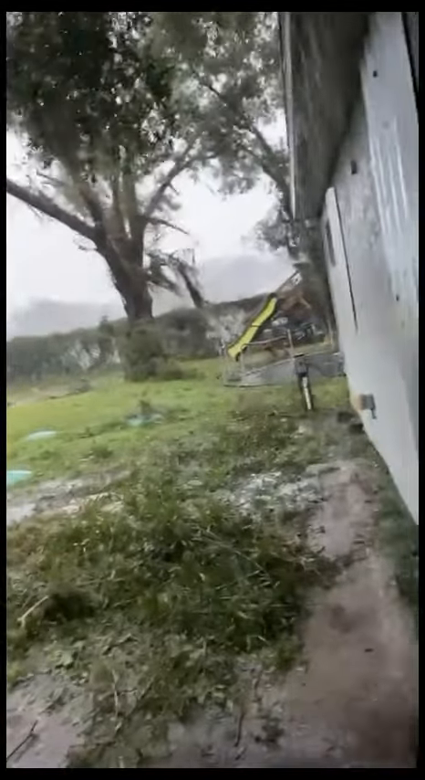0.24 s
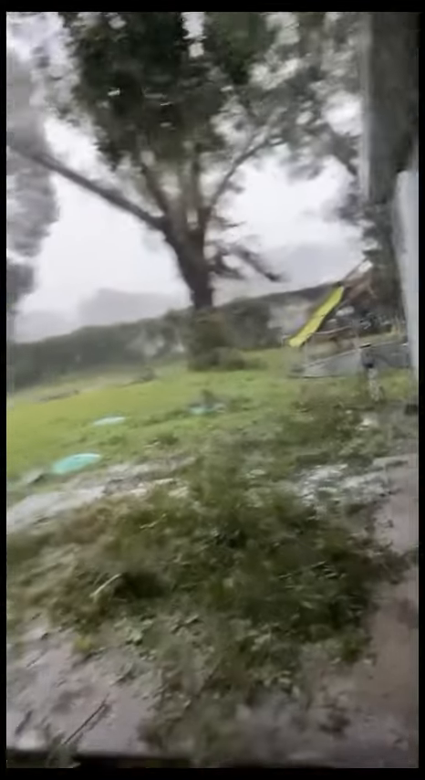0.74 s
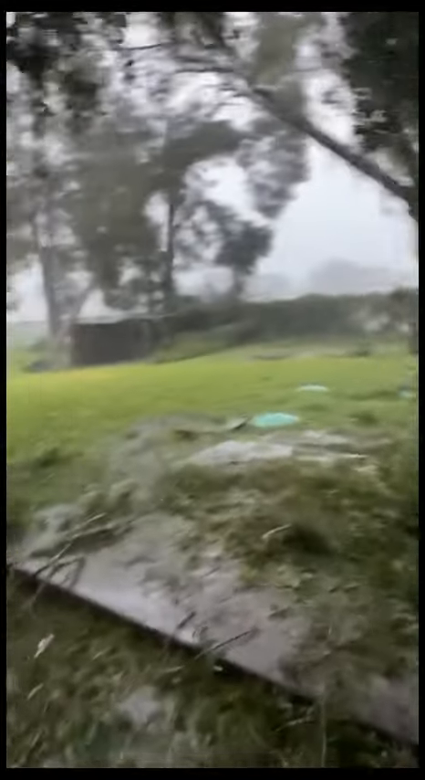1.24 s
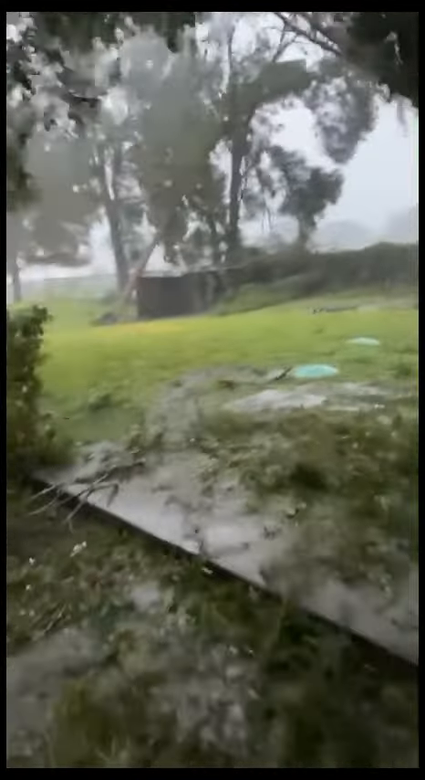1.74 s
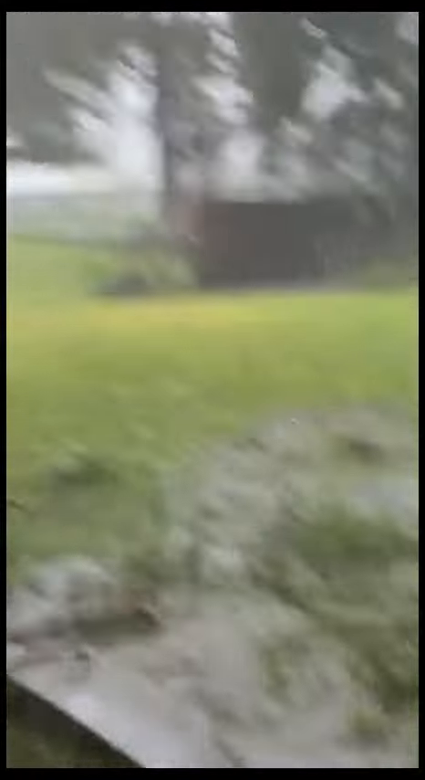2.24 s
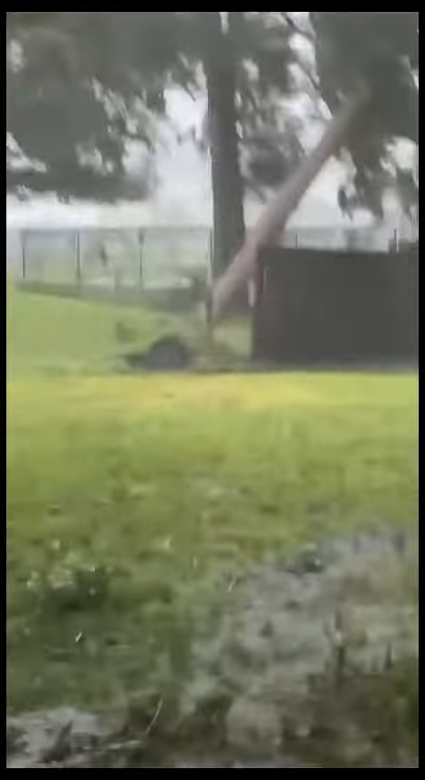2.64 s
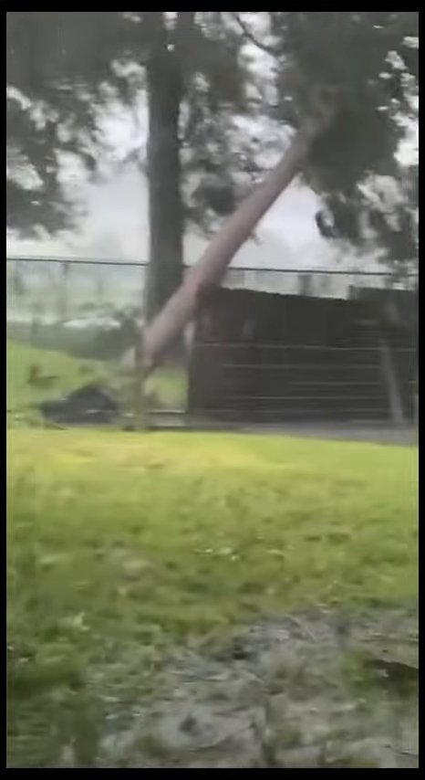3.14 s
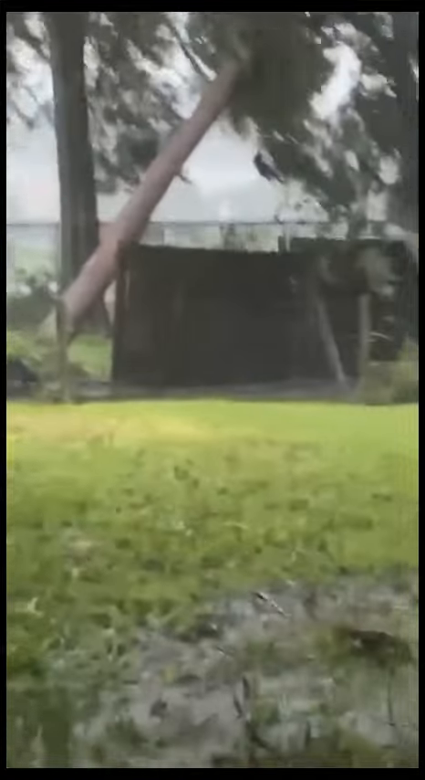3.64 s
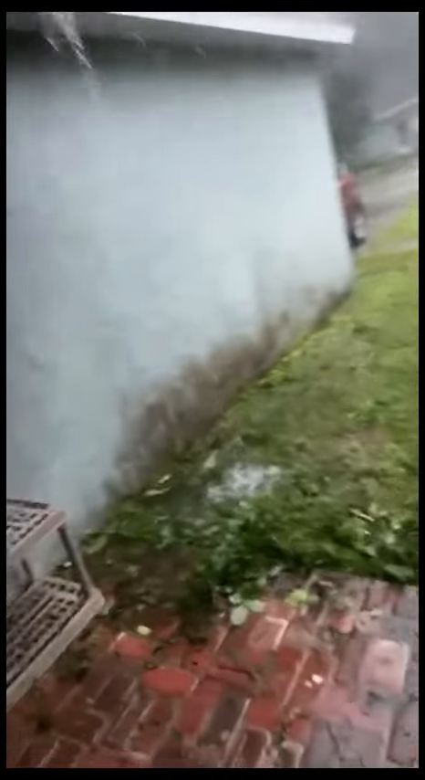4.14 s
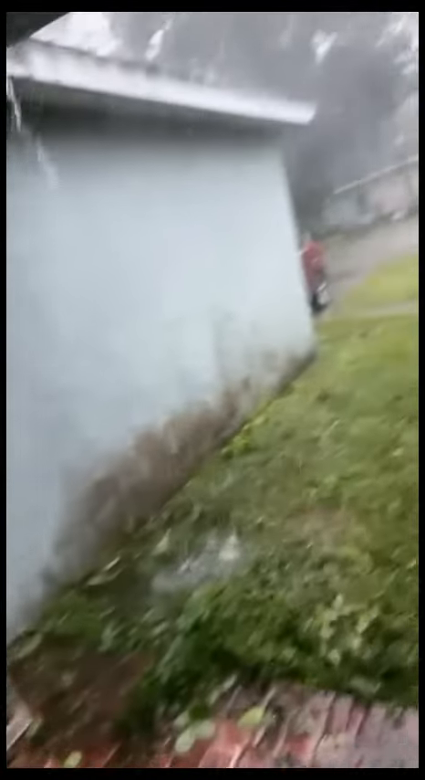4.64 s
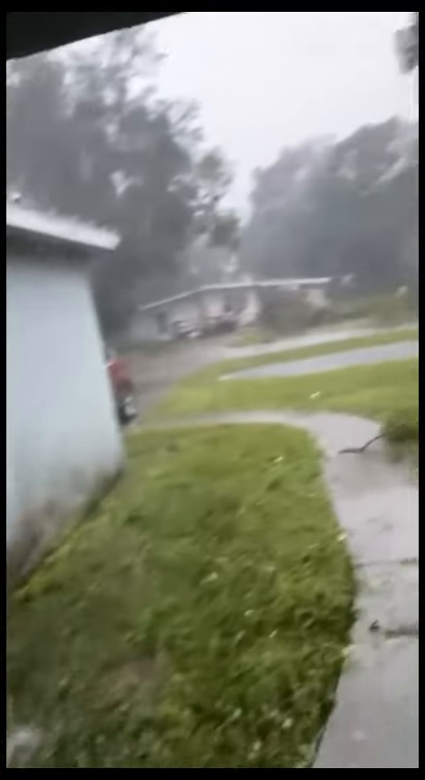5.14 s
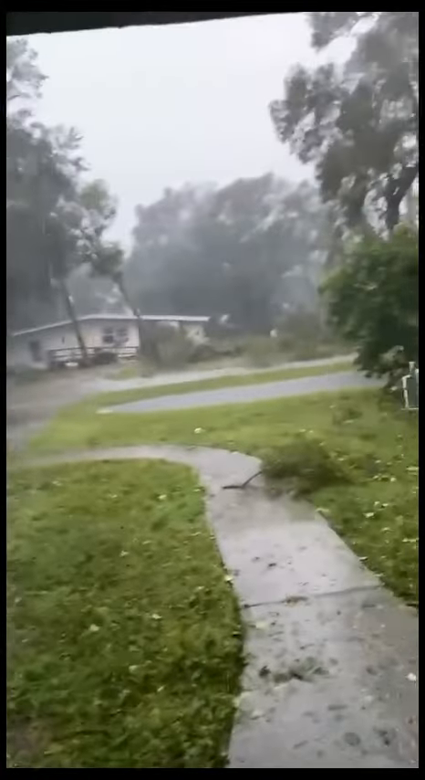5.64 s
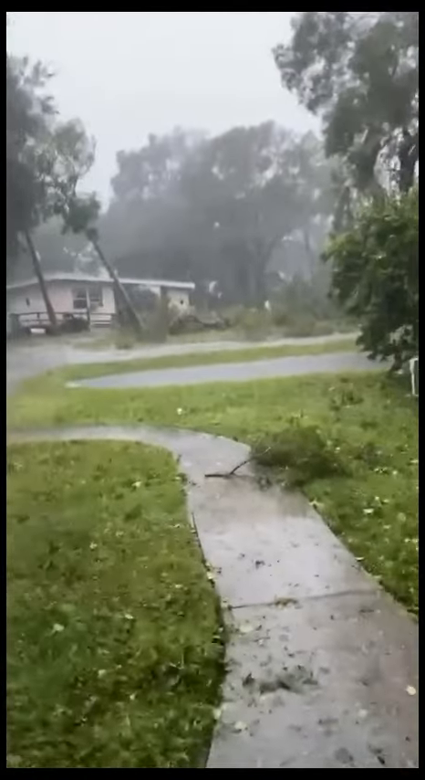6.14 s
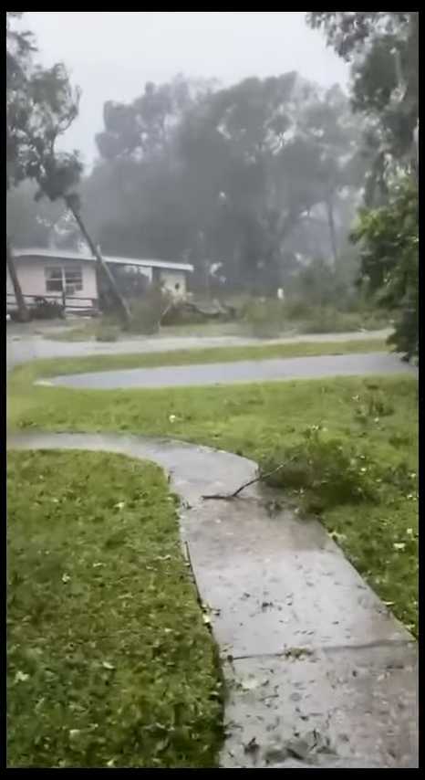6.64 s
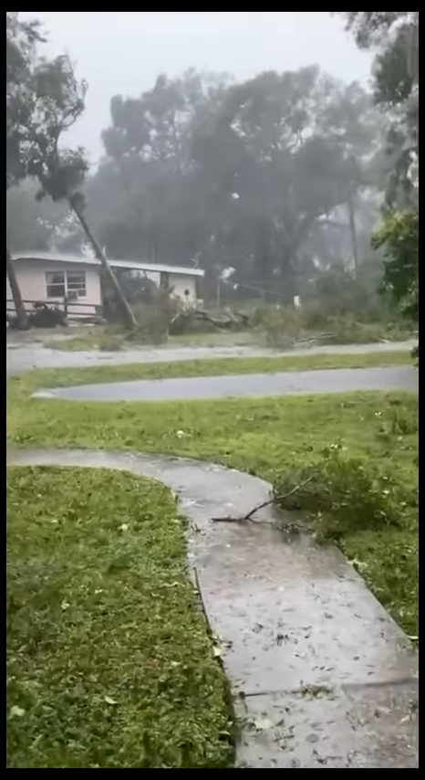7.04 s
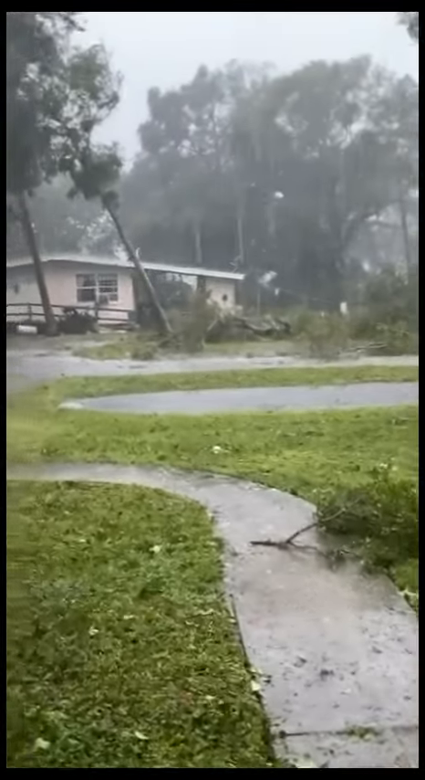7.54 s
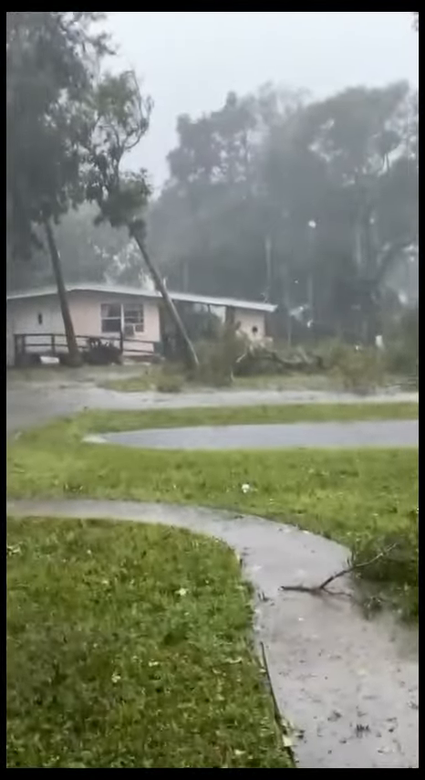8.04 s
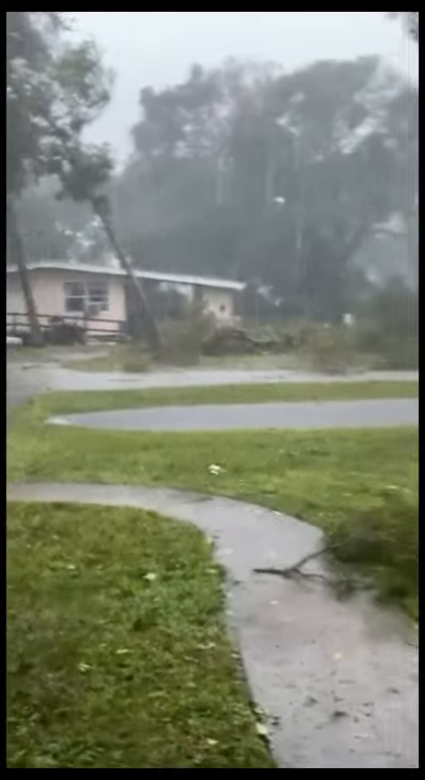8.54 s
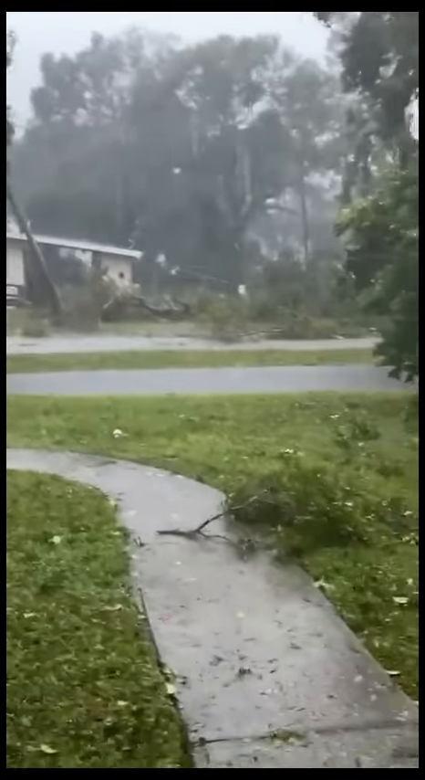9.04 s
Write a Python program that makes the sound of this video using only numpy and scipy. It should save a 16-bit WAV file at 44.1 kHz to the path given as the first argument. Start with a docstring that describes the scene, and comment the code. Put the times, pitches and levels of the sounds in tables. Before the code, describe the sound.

Heavy rain pours on a yard from the start, heard beside a house wall: a dense hiss with close drops ticking and windblown trees roaring behind it. A sharp thump of wind hits the microphone at about 1 second, followed by a few drips into puddles. From 1.7 to 2.5 seconds a strong gust buffets the microphone with loud, deep rumbles, and the rain dips briefly. More low thumps follow until about 2.8 seconds, then the wind eases. At 3.7 seconds everything cuts to silence. The rain returns at 4 seconds, quieter at first, and swells steadily over a faint low drone. From about 5.3 seconds, roof water falls into nearby puddles in frequent, irregular splashes and bubbly plops. Light puffs of wind rumble underneath, with a few soft thumps on the microphone between 8.7 and 9.2 seconds as the downpour continues.

```python
"""Storm rain pours on a yard, heard from beside a house wall; trees roar behind it.
Far drops merge into a hiss, near ones tick, and roof water rings bubbles in the puddles.
Gusts buffet the microphone as their eddies press on its port. The sound breaks off for a
moment and swells back at the front of the house, over a low drone."""
import sys
import numpy as np
from scipy import signal
from scipy.fft import rfft, irfft
from scipy.io import wavfile
from scipy.ndimage import uniform_filter1d, minimum_filter1d, map_coordinates

SR = 44100
rng = np.random.default_rng(int(sys.argv[2]) if len(sys.argv) > 2 else 0)


def dump_mix(stems):
    """Bounce the given channels to the path in sys.argv[1] as a 16-bit WAV at rate SR."""
    frames = np.atleast_2d(stems).T  # one column per channel
    limited = np.clip(frames, -1, 1)  # hard clip at full scale
    pcm = np.round(limited * 32767).astype(np.int16)
    wavfile.write(sys.argv[1], SR, pcm)


N = 409688
TIME, FREQS = np.arange(N) / SR, np.fft.rfftfreq(N, 1 / SR)
BREAK_START_S, BREAK_END_S = 3.721, 4.043
BEHIND = TIME < (BREAK_START_S + BREAK_END_S) / 2  # while the microphone is behind the house
FRONT_DB = -37.5  # reference level of the rain at the front


# Colour of the storm at the wall, behind the house and in front: (frequency [Hz], level [dB])
BACK_COLOUR = [(70, -27.5), (140, -4.5), (280, -3.5), (520, -7), (800, -8.5), (1300, -10.5), (2000, -11.5),
               (2800, -14), (3900, -12), (5500, -15), (8300, -13.5), (10300, -18.5), (12800, -20.5),
               (14800, -17), (16000, -16.5)]
FRONT_COLOUR = [(30, -16), (60, 5.5), (105, 1), (150, -1), (260, -2), (400, -2.5), (510, -7.5), (640, -4.5),
                (850, -5.5), (1150, -8), (1800, -8), (2350, -10.5), (3400, -7.5), (4500, -7), (5200, -9),
                (8500, -9.5), (10300, -16), (12900, -17.5), (14800, -13), (16000, -11)]

def storm(crossover_hz=2600, sheets_db=0.67):
    """Rain comes in sheets and fills the treble; the roar of the trees beyond fills the middle."""
    exposed = patter(near_db=-8, near_spread_db=5, spray_db=-11.5, bubbles_db=-22)
    sheltered = patter(near_db=-6, near_spread_db=2, spray_db=-5.5, bubbles_db=-17.5)
    shimmering = digital_shimmer(np.where(BEHIND, exposed, sheltered), depth_db=1.5)
    sheets = rfft(shimmering * amp(sheets_db * drift(rate_hz=21)))
    highpass = 1 / (1 + (crossover_hz / (FREQS + 1)) ** 4)
    out = np.zeros(N)
    for here, colour, roar_db in ((BEHIND, BACK_COLOUR, -3), (~BEHIND, FRONT_COLOUR, -5)):
        coloured = sheets * colour_gain(colour)
        hiss = irfft(coloured * highpass, N) / band_rms(coloured, 3000, 15000)
        roar = irfft(coloured * (1 - highpass), N) / band_rms(coloured, 1200, 2600)
        out += here * (hiss + roar * amp(roar_db + tree_surge_db()))
    return out * amp(heard_db())


# Level of the rain as heard behind the house; it wanders, and ducks briefly under the big gust:
# (time [s], level [dB])
BACK_HEARD_LEVELS = [(0.0, -32.5), (0.32, -29), (1.26, -28.5), (1.29, -27), (1.9, -29.5), (2.28, -28.5),
                     (2.45, -36), (2.64, -30.5), (3.32, -31.5), (3.68, -29.5)]

def heard_db(doubling_db=4, head_start_s=0.15):
    """Level of the rain as heard; in front it swells by equal steps as the time doubles."""
    elapsed = np.maximum(TIME - BREAK_END_S, 0) + head_start_s
    return np.where(BEHIND, curve(BACK_HEARD_LEVELS, TIME), FRONT_DB + doubling_db * np.log2(elapsed))


def patter(near_db, near_spread_db, spray_db, bubbles_db, spray_s=0.0073):
    """Far drops merge to a wash; near ones tick, each in its band; some throw spray or ring a bubble."""
    near, spray = np.zeros((2, N))
    decay = np.exp(-1 / (spray_s * SR))
    for hz in np.geomspace(1100, 12000, num=7):
        near += band(drops(count=1300, spread_db=near_spread_db), hz, spread=1.82)
        spray_power = signal.lfilter([1], [1, -decay], drops(count=230, spread_db=2.5) ** 2)
        spray += band(np.sqrt(spray_power + 1e-12) * rng.standard_normal(N), hz, spread=1.297)
    wash = rng.standard_normal(N)
    return unit(wash + amp(near_db) * unit(near) + amp(spray_db) * unit(spray)
                + amp(bubbles_db) * bubbles())


def drops(count, spread_db):
    """Drops land at random, most small and a few large."""
    when, luck, side = rng.random((count, 3)).T
    size = amp(-spread_db * np.log(luck + 0.017)) * np.sign(side - .5)
    return np.bincount((when * N).astype(int), size, N)


def bubbles(count=1200, lowest_hz=1100, octaves=2, decay_cycles=9):
    """Air trapped in the puddles rings briefly, rising in pitch."""
    out, t = np.zeros(N), np.arange(SR // 25) / SR
    for when, pitch, size in rng.random((count, 3)):
        hz = lowest_hz * 2 ** (octaves * pitch)
        ring = np.sin(2 * np.pi * hz * t * (1 + 1.35 * t)) * np.exp(-t * hz / decay_cycles)
        add(out, when * N / SR, ring * hz * amp(6.2 * size ** 3))
    return unit(out)


# Drops landing right by the microphone: (time [s], relative level [dB], band centre [Hz])
CLOSE_DROPS = [(.297, -9, 6650), (.3651, -15, 7780), (1.2988, -13, 7300), (1.3446, -13, 2600),
               (2.3807, -10, 8200), (2.6522, -13, 6130), (3.1048, -13.5, 8000), (3.4567, -10.5, 5600),
               (3.633, -13, 5760), (5.9224, -10, 5760)]

def ticks(gain_db=1):
    """Drops strike hard things at close range."""
    out = np.zeros(N)
    for s, db, hz in CLOSE_DROPS:
        tick = burst(hz, spread=1.42, crack_s=0.00047, tail_db=-16.5, tail_s=0.0026)
        add(out, s, amp(db + gain_db) * tick)
    return out


# Roof water hitting the puddles under the eaves:
# (time [s], level [dB], bubble pitch [Hz], ring relative to that level [dB])
ROOF_WATER = [(1.345, -23, 1910, 1), (1.395, -19, 2200, 0), (1.418, -20, 1320, 3), (2.018, -14, 3740, -3),
              (2.65, -23, 3743, -17), (4.688, -30, 3600, 0), (5.317, -28, 1800, 3), (5.376, -26, 2500, -1),
              (5.541, -14.5, 1950, -6), (5.665, -21, 2680, -5), (5.771, -17, 4300, -13),
              (5.924, -16, 4500, -3), (6.249, -19, 2900, -8), (6.398, -26, 3100, 3), (6.868, -25, 3220, 2),
              (7.16, -19, 2120, 1.5), (7.322, -14, 2560, -5), (7.689, -17.5, 1600, -7),
              (7.844, -11.5, 2450, -7), (7.984, -24.5, 870, 4.5), (8.158, -11.5, 2520, -9),
              (8.353, -19, 2730, 1.5), (8.513, -13, 2400, -10), (9.029, -15, 915, 0.5)]

def splashes(drip_count=40, lowest_hz=1700, octaves=1.43, above_rain_db=10.5, spread_db=8):
    """Roof water falls loudly into puddles; lesser drips scatter along the front of the house."""
    out, rain_level = np.zeros(N), heard_db()
    for s, db, hz, ring_db in ROOF_WATER:
        add(out, s, splash(db, hz, ring_db))
    for when, softness, pitch in rng.random((drip_count, 3)):
        s = BREAK_END_S + when * (TIME[-1] - BREAK_END_S)
        db = rain_level[int(s * SR)] + above_rain_db - spread_db * softness
        add(out, s, splash(db, lowest_hz * 2 ** (octaves * pitch), ring_db=-5))
    return out


def splash(db, hz, ring_db, spray_db=-3.3):
    """A fall of water rings a cluster of bubbles and throws a spray, pitched a little higher."""
    ring = burst(hz, spread=1.14, crack_s=0.007, tail_db=-20, tail_s=.015)
    spray = burst(hz * 1.23, spread=1.75, crack_s=0.00096, tail_db=-1.5, tail_s=0.03, order=3)
    return amp(db) * (amp(ring_db) * ring + amp(spray_db) * spray)


# Colour of the eddies on the microphone at the reference strength: (frequency [Hz], level [dB])
EDDY_COLOUR = [(70, -22), (130, -1), (200, 0), (350, -4), (600, -14.5), (1000, -26), (1500, -36.5),
               (3000, -47.5)]
# Buffets within the big gust behind the house: (time [s], length [s], relative level [dB])
GUST_BUFFETS = [(1.743, 0.079, -12.5), (1.86, 0.025, -14), (1.945, .05, -20), (2.027, 0.029, -6.5),
                (2.06, .075, -11), (2.15, .05, -21), (2.203, .025, -13), (2.258, .045, -10.5),
                (2.305, .095, -8.5), (2.41, 0.026, -11.5), (2.725, .022, -20)]

def gust(gain_db=1, reference_db=-14, db_per_octave=17, lumps_db=1.66):
    """Faster air carries eddies past the microphone sooner, so stronger buffets are higher in pitch."""
    eddies = coloured_noise(EDDY_COLOUR)
    small_eddies = blow_power([(1.58, 1.3, -33)], rise_s=.15, fall_s=.05)  # between the buffets
    buffets = blow_power(GUST_BUFFETS, rise_s=.008, fall_s=.012)
    strength_db = 10 * np.log10(small_eddies + buffets + 1e-12) + lumps_db * drift(rate_hz=34.8)
    travel = np.cumsum(2 ** ((strength_db - reference_db) / db_per_octave))
    air = map_coordinates(eddies, [travel % (N - 1)], order=3)
    return steadied(air, samples=1500) * amp(gain_db + strength_db)


# Single eddies right on the microphone: (time [s], level [dB], pitch sweep [Hz], decay [s])
EDDY_THUMPS = [(0.967, -1.5, 2490, 0.012), (1.42, -9, 1110, 0.011), (1.627, -9, 110, 0.0095),
               (2.03, -4, 1980, 0.016), (2.683, -6.5, 90.6, 0.027), (2.728, -4.5, 257, 0.0092),
               (2.806, -8.5, 120.4, 0.016), (8.679, -11.5, 159, 0.025), (8.88, -10.5, 171, 0.0092),
               (9.244, -20, 70, 0.033)]

def thumps(rest_hz=15, halving_cycles=0.88, rise_s=0.00029):
    """A passing eddy swings the pressure quickly at first, then ever more slowly."""
    out, t = np.zeros(N), np.arange(SR // 8) / SR
    for s, db, sweep_hz, decay_s in EDDY_THUMPS:
        hz = rest_hz + sweep_hz / (1 + t * sweep_hz / halving_cycles)
        envelope = (1 - np.exp(-t / rise_s)) * np.exp(-(t / decay_s) ** 1.27)
        add(out, s, -amp(db) * envelope * np.sin(2 * np.pi * np.cumsum(hz) / SR))
    return out


# Colour of the wind at the microphone port: (frequency [Hz], level [dB])
RUMBLE_COLOUR = [(12, -19), (25, -13.5), (40, -6), (62, 4.5), (105, 1), (135, -7), (170, -9.5),
                 (300, -27.5), (800, -72)]
# Puffs that reach the microphone by the wall: (time [s], length [s], relative level [dB])
WIND_PUFFS = [(.42, 0.078, -27), (1.57, 0.22, -23.5), (1.745, 0.16, -11.5), (1.94, 0.39, -12.5),
              (2.3, .14, -11.5), (2.59, 0.26, -19), (2.88, 0.19, -24.5), (3.34, 0.086, -25),
              (3.62, 0.08, -28.5), (5.46, 0.059, -39), (5.89, 0.14, -34.5), (6.88, 0.53, -33.5),
              (7.48, 0.31, -35.5), (7.98, 0.1, -31.5), (8.57, 0.38, -28.5)]

def rumble(gain_db=-1, lumps_db=1.7, back_db=-1, front_db=-12):
    """Large eddies press on the microphone port: a breeze, with puffs on top."""
    air = steadied(coloured_noise(RUMBLE_COLOUR), samples=3000)
    breeze = amp(heard_db() + np.where(BEHIND, back_db, front_db))
    puffs = blow_power(WIND_PUFFS, rise_s=0.02, fall_s=0.02)
    return air * np.sqrt(breeze ** 2 + puffs) * amp(gain_db + lumps_db * drift(rate_hz=23))


def blow_power(rows, rise_s, fall_s):
    """Blows of air rise, hold and die away; rows are (time [s], length [s], level [dB])."""
    power = np.zeros(N)
    for s, length, db in rows:
        rise = np.clip((TIME - s) / rise_s, 0, 1)
        fall = np.exp(-np.maximum(TIME - s - length, 0) / fall_s)
        power += (amp(db) * rise * fall) ** 2
    return power


# Wind in the trees beyond the back yard: (crest time [s], half width [s], extra level [dB])
TREE_SURGES = [(.68, 0.14, 1.5), (1.38, 0.053, 1), (3.68, 0.18, 2.5)]

def tree_surge_db():
    """Wind surges through the trees and briefly lifts their roar."""
    return sum(db * np.exp(-((TIME - s) / width) ** 2) for s, width, db in TREE_SURGES)


def drone(hz=105, base_db=-46.5, swell_share=0.38):
    """A narrow band of low noise hangs at the front of the house, swelling less than the rain."""
    level_db = base_db + swell_share * (heard_db() - FRONT_DB)
    return ~BEHIND * amp(level_db) * unit(band(rng.standard_normal(N), hz, spread=1.124))


def digital_shimmer(x, depth_db):
    """A faint, patchy digital shimmer laid over the hiss."""
    cells = signal.stft(x, nperseg=1024)[2]
    patches = uniform_filter1d(rng.standard_normal(cells.shape), size=3, axis=0)
    patches = unit(uniform_filter1d(patches, size=3, axis=1))
    return signal.istft(cells * amp(depth_db * patches), nperseg=1024)[1][:N]


def burst(hz, spread, crack_s, tail_db, tail_s, order=2):
    """One impact of peak 1: a crack, then a clumpy tail, in a band around hz."""
    t = np.arange(SR // 8) / SR
    noise, clumps = rng.standard_normal((2, len(t)))
    envelope = np.exp(-t / crack_s) + amp(tail_db) * abs(clumps) * np.exp(-t / tail_s)
    hit = band(noise * envelope, hz, spread, order)
    return hit / abs(hit).max()


def band(x, hz, spread, order=2):
    """A resonance from hz / spread to hz * spread."""
    edges = np.clip([hz / spread, hz * spread], [20, 30], [.4 * SR, .45 * SR])
    return signal.sosfilt(signal.butter(order, edges, "bandpass", fs=SR, output="sos"), x)


def band_rms(spectrum, low_hz, high_hz):
    """The rms of a sound between two frequencies."""
    return np.std(irfft(spectrum * (FREQS > low_hz) * (FREQS < high_hz), N))


def colour_gain(colour):
    """Joins (frequency [Hz], level [dB]) points into gains along a log-frequency axis."""
    hz, db = np.transpose(colour)
    return amp(np.interp(np.log(FREQS + 1), np.log(hz + 1), db))


def coloured_noise(colour):
    """Noise with the given colour."""
    return irfft(rfft(rng.standard_normal(N)) * colour_gain(colour), N)


def steadied(x, samples):
    """Evens out the slow swings of a noise, leaving its fast lumps."""
    return x / np.sqrt(uniform_filter1d(uniform_filter1d(x ** 2, samples), samples) + 1e-12)


def drift(rate_hz):
    """A random wander of rms 1, up to the given rate."""
    t = np.arange(0, N / SR + 1, 1 / 400)
    hz = np.fft.rfftfreq(len(t), t[1])
    slow = rfft(rng.standard_normal(len(t))) / (1 + (hz / rate_hz) ** 4)
    return np.interp(TIME, t, unit(irfft(slow, len(t))))


def curve(rows, t):
    """Reads (time [s], value) points at the times t."""
    return np.interp(t, *np.transpose(rows))


def add(mix, s, sound):
    """Mixes a sound in at s seconds."""
    part = mix[max(round(s * SR), 0):][:len(sound)]
    part += sound[:len(part)]


def amp(db):
    """Decibels to gain."""
    return 10 ** (np.asarray(db) / 20)


def unit(x):
    """Scales to rms 1."""
    return x / np.sqrt(np.mean(x ** 2) + 1e-20)


def scene(fade_out_s=0.0015, fade_in_s=0.0027):
    """Rain, drips and wind at one microphone by the wall, silent during the break."""
    fade_out = np.exp(-np.maximum(TIME - BREAK_START_S, 0) / fade_out_s)
    fade_in = np.clip((TIME - BREAK_END_S) / fade_in_s, 0, 1)
    yard = storm() + drone() + rumble() + gust() + thumps() + ticks() + splashes()
    return ((fade_out + fade_in) * yard)[None]


def record(dry, ceiling=.88, cutoff_hz=15800):
    """A fast limiter holds the buffets under full scale; a low-pass takes off the highest treble."""
    safe_gain = np.minimum(ceiling / (abs(dry) + 1e-9), 1)
    limited = dry * uniform_filter1d(minimum_filter1d(safe_gain, size=300), size=300)
    lowpass = signal.firwin(511, cutoff_hz, window=("kaiser", 9), fs=SR)
    return signal.oaconvolve(limited, lowpass[None], "same")


dry = scene()
out = record(dry)
dump_mix(out)
```